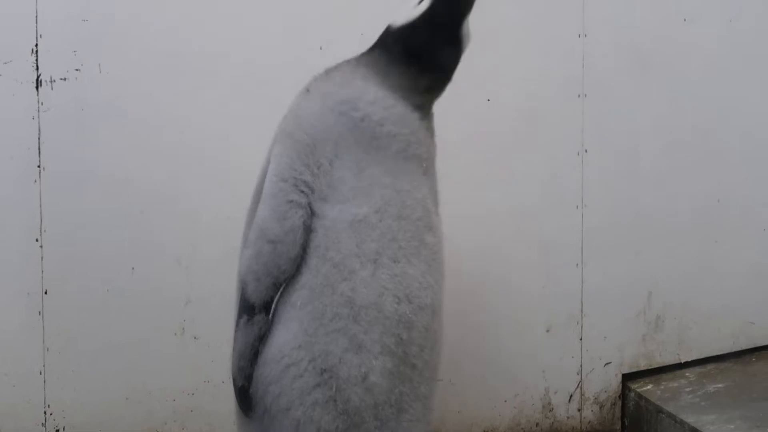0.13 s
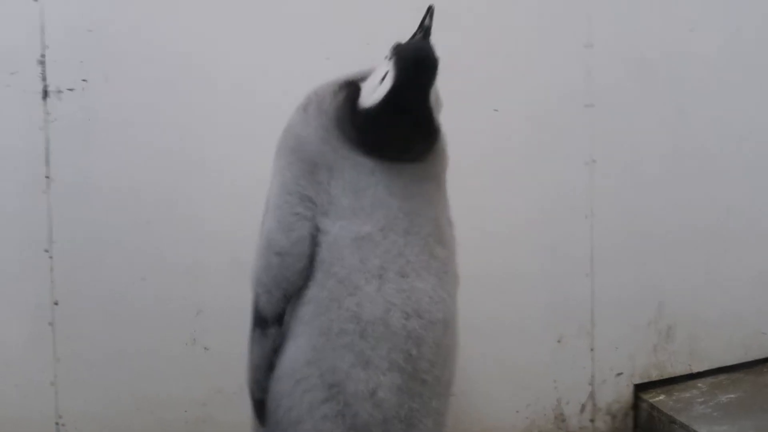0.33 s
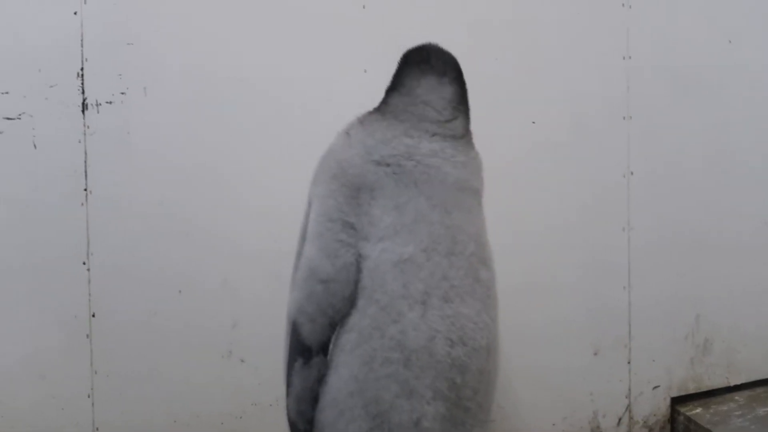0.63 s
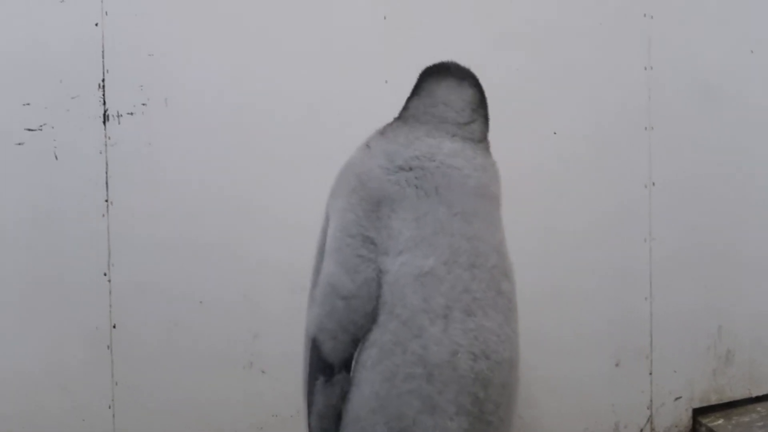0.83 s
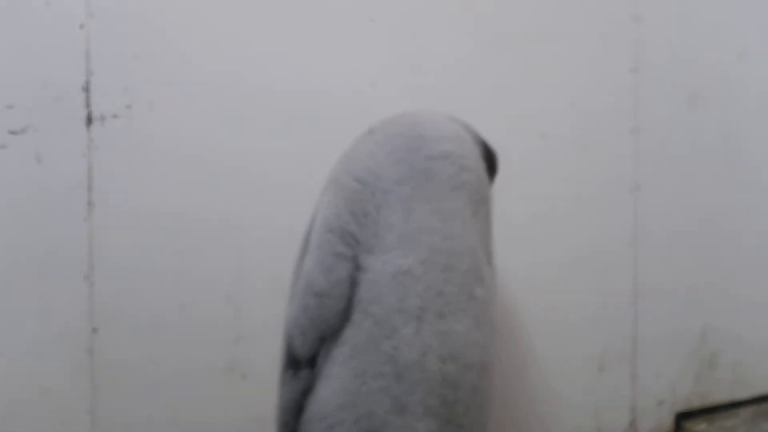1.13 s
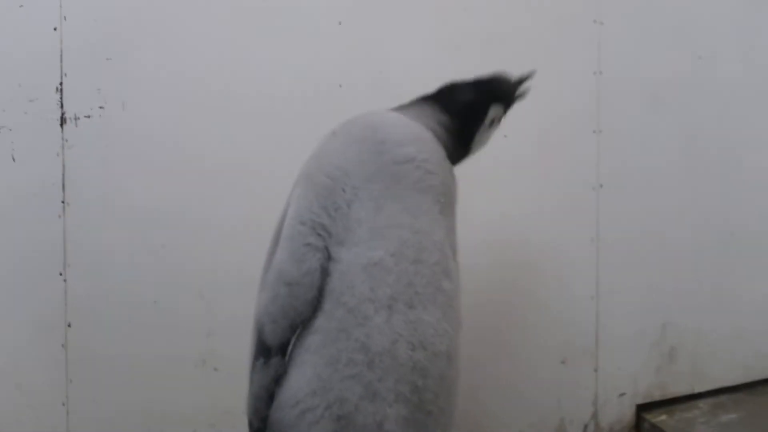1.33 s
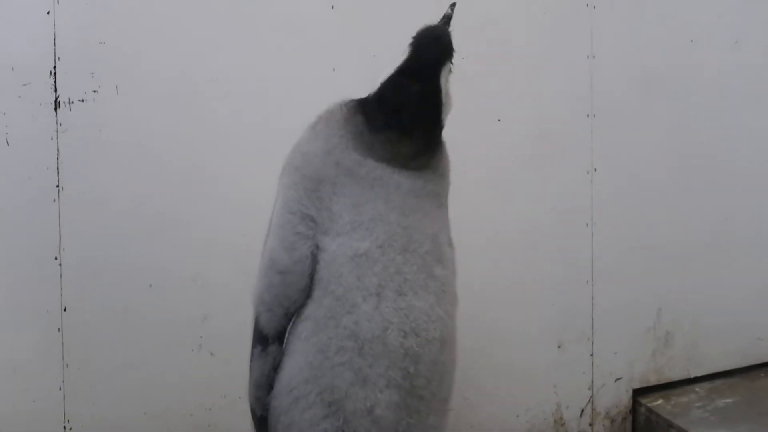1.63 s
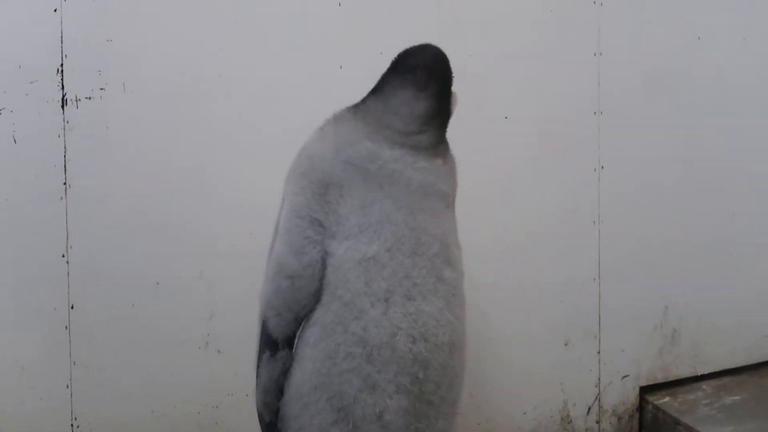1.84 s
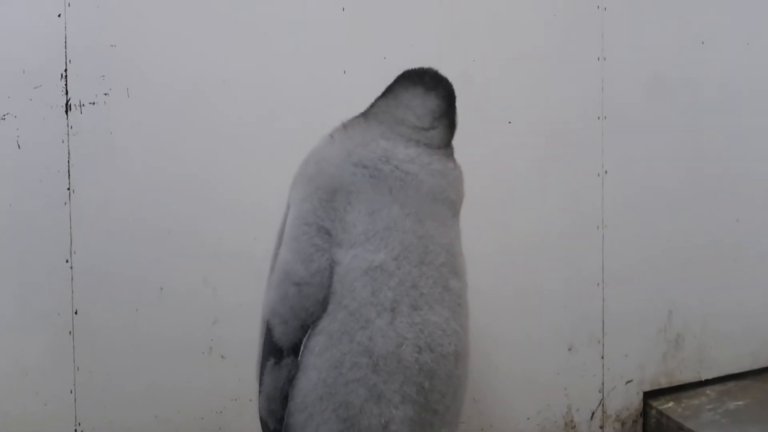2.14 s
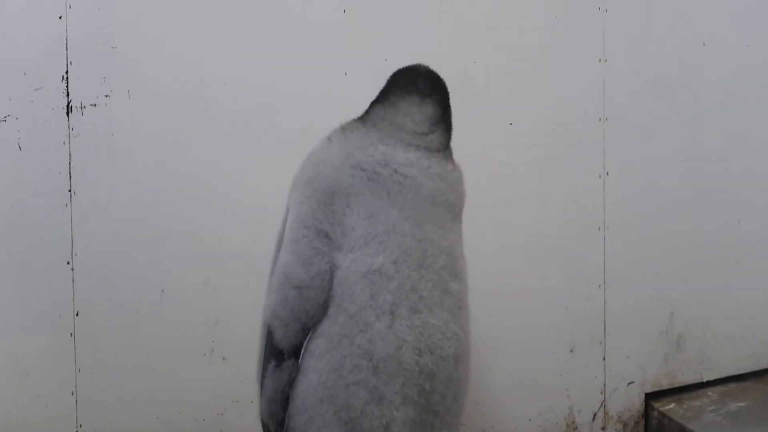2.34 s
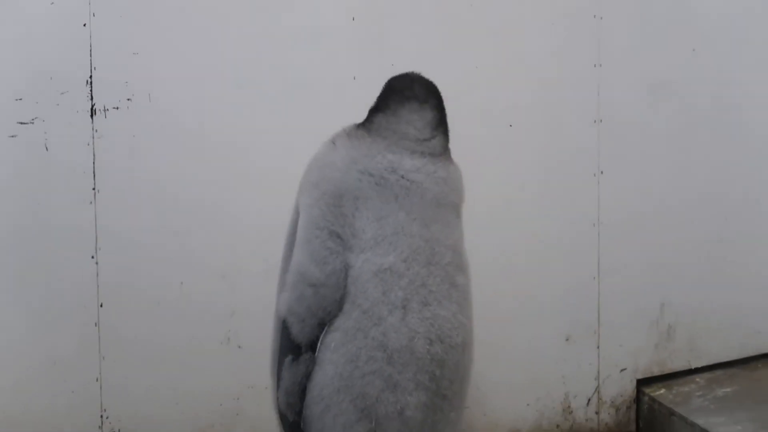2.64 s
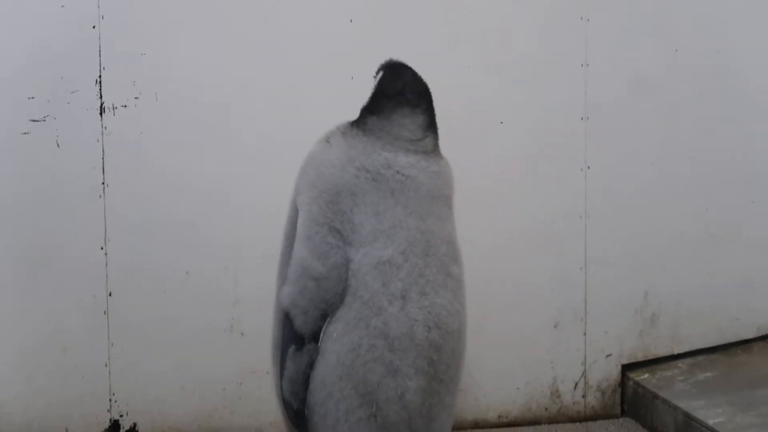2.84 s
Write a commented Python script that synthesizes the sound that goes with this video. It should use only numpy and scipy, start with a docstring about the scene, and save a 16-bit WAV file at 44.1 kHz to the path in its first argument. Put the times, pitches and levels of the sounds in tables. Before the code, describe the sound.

A penguin chick gives two shrill, rough-edged whistling calls in a bare, hard-walled room. Silence until 0.08 seconds, then sound opens abruptly inside the first call, which swoops up and down, falling until 0.35. Echoes fade. A second fluttering call runs from 1.25 to 1.6 and rings away. Low fans hum throughout; soft handling thuds come before 0.3, with tiny close rustles scattered later.

```python
"""A penguin chick whistles two calls of swooping, U-shaped notes in a bare, hard-walled cold room.
Cooling fans drone and hum all the time; soft rustles pass near the two-port microphone.
The chick is a pair of beating sine whistles with wall echoes and a noise tail; the fans are filtered
noise and motor tones; rustles, thuds and grip rumble are short swells of noise or low tone.
Silence comes first: the sound opens abruptly a moment after the start."""
import sys
import numpy as np
from scipy import signal
from scipy.fft import rfft, irfft, next_fast_len
from scipy.io import wavfile
from scipy.ndimage import uniform_filter1d, map_coordinates

SR = 44100
rng = np.random.default_rng(int(sys.argv[2]) if len(sys.argv) > 2 else 0)


def persist_wave(psi):
    """Save psi, clipped to +-1, as 16-bit WAV."""
    counts = np.round(np.clip(psi, -1, 1) * 32767).astype(np.int16)
    wavfile.write(sys.argv[1], SR, np.atleast_2d(counts).T)


def level_to_linear(level):
    """Convert decibel levels to linear amplitude factors, elementwise."""
    exponent = np.asarray(level, float) / 20
    return 10 ** exponent


N = 131418
TIME_S = np.arange(N) / SR


def unit(x):
    """Scales a signal to rms 1."""
    return x / np.sqrt(np.mean(x ** 2) + 1e-20)


def along(points, hz):
    """Reads a curve of (freq_hz, value) points on a log frequency axis."""
    freq_hz, value = np.transpose(points)
    return np.interp(np.log(hz + 1), np.log(freq_hz + 1), value)


def wobble(rate):
    """A smooth random curve with rate knots a second."""
    knots = rng.standard_normal(int(N * rate / SR) + 4)
    return map_coordinates(knots, [np.arange(N) * rate / SR])


def coloured(x, gain):
    """Filters x by a gain over frequency and scales it to rms 1."""
    size = next_fast_len(N + 8192)
    spectrum = rfft(x, size) * gain(np.fft.rfftfreq(size, 1 / SR))
    return unit(irfft(spectrum, size)[:N])


def hiss():
    """Plain white noise for the whole length."""
    return rng.standard_normal(N)


def rush(spectrum, patchy_db):
    """Noise of the given spectrum, rms 1, with random gain in patches of time and frequency."""
    cells = signal.stft(hiss(), nperseg=512)[2]
    field = uniform_filter1d(rng.standard_normal(cells.shape), size=6, axis=0)
    field = uniform_filter1d(field, size=14, axis=1)
    patchy = signal.istft(cells * level_to_linear(patchy_db * unit(field)), nperseg=512)[1][:N]
    return coloured(patchy, lambda hz: level_to_linear(along(spectrum, hz)))


def bursts(rows):
    """Bell-shaped swells from (centre_s, level_db, half_length_s) rows; half length is down to 1/e."""
    return sum(level_to_linear(db) * np.exp(-((TIME_S - s) / half) ** 2) for s, db, half in rows)


def at_ports(mid, side):
    """Left and right ports from the shared sound and the sound opposite between them."""
    return np.array([mid + side, mid - side])


# Spectrum shape of the fan air heard alike at both ports: freq_hz [Hz], density_db [relative dB per Hz]
FAN_SPECTRUM = [(12, -42.5), (20, -18), (59, -9), (86, -5.5), (171, -4), (204, -10.5), (278, -10.5),
                (340, -14.5), (506, -17.5), (604, -18), (1460, -27.5), (2600, -36), (3960, -46),
                (5000, -50.5), (8000, -59.5), (11000, -65.5), (14800, -70), (15400, -100)]
# Slow course of the drone, of which only the departure from its mean counts: time_s [s], strength_db [dB]
DRONE_COURSE = [(0.7, -35), (0.85, -34.5), (1.23, -35), (1.48, -35), (2.19, -33.5), (2.71, -35),
                (2.93, -35.5)]
FAN_DB, FLUTTER_DB = -30, 0.5  # rush level; slow chance swell


def fan_rush():
    """Turbulent air as patchy noise that swells slowly with the drone."""
    time_s, strength_db = np.transpose(DRONE_COURSE)
    drift_db = np.interp(TIME_S, time_s, strength_db - strength_db.mean())
    swell = level_to_linear(drift_db + FLUTTER_DB * wobble(3.1))
    return level_to_linear(FAN_DB) * swell * rush(FAN_SPECTRUM, patchy_db=1.0)


# Wavering motor tones: freq_hz [Hz], level_db [dB rms], width_hz [Hz from centre to half gain]
MOTOR_TONES = [(59, -43.5, 4.5), (116, -39.5, 7.2), (206.9, -43.5, 3.3), (284.5, -46, 2.6),
               (379.6, -48.5, 3.2), (477.2, -53.5, 2.9), (571.2, -51.5, 5.6)]


def motor_hum():
    """Motor tones as narrow bands of noise, so each one wavers by itself."""
    hum = 0
    for freq_hz, level_db, width_hz in MOTOR_TONES:
        band = coloured(hiss(), lambda f: 1 / (1 + ((f - freq_hz) / width_hz) ** 2))
        hum = hum + level_to_linear(level_db) * band
    return hum


STEADY_HZ, STEADY_DB = 119.6, -36.5  # level is rms, about which it wavers


def steady_hum():
    """The steady part of the hum: one sine with a little drift in level and phase."""
    level = level_to_linear(STEADY_DB + 0.94 * wobble(6.1))
    phase = 2 * np.pi * STEADY_HZ * TIME_S + 0.61 * wobble(3.055)
    return level * np.sqrt(2) * np.sin(phase)


# Spectrum shape of the air that differs between the ports: freq_hz [Hz], density_db [relative dB per Hz]
APART_SPECTRUM = [(25, 0.5), (100, -11), (180, 3), (330, 9), (1100, 4), (3900, -3), (6000, -9),
                  (10000, -16), (14500, -22.5), (15300, -59)]
APART_DB = -53


def fans():
    """Air rush and motor tones nearly alike at both ports, plus weak air noise opposite between them."""
    mid = fan_rush() + motor_hum() + steady_hum()
    return at_ports(mid, level_to_linear(APART_DB) * rush(APART_SPECTRUM, patchy_db=0.6))


WHINE_HZ, WHINE_DB = 13006, -88  # level is rms


def whine():
    """A thin electronic tone: one steady sine."""
    return level_to_linear(WHINE_DB) * np.sqrt(2) * np.sin(2 * np.pi * WHINE_HZ * TIME_S)


# Handling rumble: centre_s [s], level_db [dB at the peak of the swell], half_length_s [s down to 1/e]
GRIP_SWELLS = [(0.2, -44, .13)]
GRIP_HZ = 200  # half gain


def grip_rumble():
    """Low handling noise, opposite in sign at the two ports."""
    low = coloured(hiss(), lambda f: 1 / (1 + (f / GRIP_HZ) ** 2))
    return bursts(GRIP_SWELLS) * low * [[1], [-1]]


# Thuds of the hand-held body: centre_s [s], level_db [dB, peak of the bell before the port gains]
THUDS = [(0.091, -21.5), (0.28, -26)]
THUD_HZ, THUD_HALF_S, THUD_LEFT_DB = 35, 0.015, 1  # the left port gains what the right port loses


def thuds():
    """Low sines under short bells, a little stronger at the left port."""
    thud = 0
    for centre_s, level_db in THUDS:
        bell = bursts([(centre_s, level_db, THUD_HALF_S)])
        thud = thud + bell * np.sin(2 * np.pi * THUD_HZ * (TIME_S - centre_s))
    return thud * level_to_linear([[THUD_LEFT_DB], [-THUD_LEFT_DB]])


# Rustles: centre_s [s], level_db [dB rms of the part apart at the swell's peak], half_length_s [s to 1/e]
RUSTLE_SWELLS = [(0.26, -61, .008), (0.96, -67, 0.0069), (1.101, -55, 0.023), (1.25, -71.5, .03),
                 (1.42, -58, 0.005), (1.9, -65, 0.032), (2.08, -60, 0.012), (2.25, -74, 0.027),
                 (2.7, -65, 0.0094)]
# Spectrum shape of a rustle: freq_hz [Hz], density_db [relative dB per Hz]
RUSTLE_SPECTRUM = [(3000, -27), (4000, 2), (5600, 0.5), (8000, -3.5), (11500, -10), (15000, -21.5)]
RUSTLE_SHARED_DB = -2.5  # shared part relative to the part apart


def rustles():
    """Brief noise close to the ports, so partly shared and partly opposite between them."""
    mid = level_to_linear(RUSTLE_SHARED_DB) * rush(RUSTLE_SPECTRUM, patchy_db=2.5)
    side = rush(RUSTLE_SPECTRUM, patchy_db=2.0)
    return bursts(RUSTLE_SWELLS) * at_ports(mid, side)


# Decay of the room: freq_hz [Hz], t60_s [s to fall by 60 dB]
ROOM_DECAY = [(1000, 1.0), (2000, 0.81), (3000, 0.82), (4500, .7), (9000, 0.23)]
# Echoes off the near walls: delay_s [s], level_db [dB relative to the direct sound]
WALL_ECHOES = [(.004, -1.5), (.009, -14.5), (0.012, -10), (.021, -6.5), (0.029, -20)]
# Colour of the tail that is apart, stronger in the treble: freq_hz [Hz], gain_db [relative dB]
SIDE_TILT = [(1000, 0.5), (2000, -1.5), (3500, 5), (6000, 10.5)]
ECHO_DB, SIDE_ECHO_DB = -0.5, -13  # tail shared by the ports; tail apart
CHICK_LEFT_DB = 0.6  # the left port gains what the right port loses


def room(x):
    """Direct sound and near walls, then a diffuse tail: one shared by both ports, one apart."""
    hz, time_s, cells = signal.stft(rng.standard_normal((2, SR)), SR, nperseg=256)
    decay = level_to_linear(-60 * time_s / along(ROOM_DECAY, hz)[:, None])
    tail = signal.istft(cells * decay, SR, nperseg=256)[1]
    tail = tail / np.linalg.norm(tail[0]) * level_to_linear([[ECHO_DB], [SIDE_ECHO_DB]])
    late = np.pad(x, (350, 0))[None]  # the tail starts 350 samples after the direct sound
    mid, side = signal.fftconvolve(late, tail, axes=1)[:, :N]
    side = np.std(side) * coloured(side, lambda f: level_to_linear(along(SIDE_TILT, f)))
    near = x
    for delay_s, level_db in WALL_ECHOES:
        near = near + level_to_linear(level_db) * np.pad(x, (round(delay_s * SR), 0))[:N]
    return at_ports(mid, side) + near * level_to_linear([[CHICK_LEFT_DB], [-CHICK_LEFT_DB]])


# The two calls as bends of the whistle: time_s [s], pitch_hz [Hz], level_db [relative dB]
FIRST_CALL = [(0.0, 2475, -22), (0.018, 2900, -34.5), (0.035, 2330, -14.5), (0.05, 1755, -24),
              (0.066, 2065, -27.5), (0.086, 1995, -19), (0.101, 1720, -22.5), (0.125, 1629, -21.5),
              (0.145, 2193, -21.5), (0.165, 2799, -26), (0.173, 2395, -40.5), (0.182, 2142, -30.5),
              (0.2, 1757, -19), (0.22, 1315, -43), (0.235, 1508, -26.5), (0.25, 1771, -26),
              (0.262, 1857, -30.5), (0.272, 1993, -41), (0.284, 1790, -23.5), (0.292, 1720, -20.5),
              (0.297, 1359, -31), (0.315, 1254, -29.5), (0.324, 1148, -37.5), (0.336, 1123, -31.5),
              (0.35, 1147, -46.5)]
SECOND_CALL = [(1.241, 2358, -55.5), (1.251, 2450, -23), (1.258, 2805, -30.5), (1.265, 2425, -24.5),
               (1.279, 2543, -37.5), (1.296, 2432, -62.5), (1.311, 2416, -26.5), (1.323, 2848, -34.5),
               (1.333, 2250, -23.5), (1.341, 1952, -23.5), (1.354, 1721, -17.5), (1.364, 1681, -21.5),
               (1.378, 1902, -15.5), (1.388, 2059, -20), (1.396, 2044, -32), (1.409, 2089, -16.5),
               (1.422, 2122, -33.5), (1.432, 2052, -41), (1.443, 1895, -31.5), (1.453, 1791, -14.5),
               (1.46, 1523, -30), (1.472, 1399, -39), (1.49, 1520, -22), (1.512, 1817, -31.5),
               (1.524, 1999, -31.5), (1.538, 1810, -33), (1.552, 1720, -22.5), (1.562, 1350, -26),
               (1.576, 1483, -32.5), (1.6, 1696, -37.5), (1.625, 1547, -32), (1.645, 1450, -67)]
# Whistle, second and third partial: level_db [relative dB]
PARTIALS_DB = [-3, -16.5, -30.5]
# Voice breaks that add a side tone: centre_s [s], level_db [relative dB], half_length_s [s to 1/e],
# pitch_ratio [times the whistle]
VOICE_BREAKS = [(0.056, -6, 0.013, 1.5), (0.141, -8, 0.012, 1.48), (0.179, -10.5, 0.0087, 1.6),
                (0.263, -2.5, 0.011, 1.48), (1.388, -1, .005, 1.1), (1.395, -5, 0.0058, 1.48),
                (1.432, 2.5, 0.015, 1.25), (1.483, -12, 0.023, 1.9), (1.518, -4, 0.015, 1.4),
                (1.549, -9, 0.007, 1.5)]
# Colour of the throat: freq_hz [Hz], gain_db [relative dB]
THROAT_COLOUR = [(900, -6), (1300, -3.5), (1750, 1.5), (2100, 0.5), (2800, -1.5), (3500, -6.5), (4200, -12),
                 (4700, -22.5), (5600, -17.5), (7000, -30)]
TWIN_RATIO, TWIN_DB = 1.037, -7  # second half of the voice box: pitch ratio, relative level
JITTER, SHIMMER_DB = 0.008, 0.5  # scatter of pitch as a share, scatter of level
BREATH_DB = -19  # air noise relative to the whistle
CALL_LIFT_DB = 2  # added to the call levels


def whistle_pair(pitch_hz):
    """The two halves of the voice box, one a little higher so they beat, with partials and breaks."""
    tone = 0
    for ratio, level_db in [(1, 0), (TWIN_RATIO, TWIN_DB)]:
        unsteady_hz = ratio * pitch_hz * (1 + JITTER * wobble(250))
        phase = 2 * np.pi * np.cumsum(unsteady_hz) / SR
        half = sum(level_to_linear(db) * np.sin((k + 1) * phase) for k, db in enumerate(PARTIALS_DB))
        for centre_s, break_db, half_length_s, pitch_ratio in VOICE_BREAKS:
            half = half + bursts([(centre_s, break_db, half_length_s)]) * np.sin(pitch_ratio * phase)
        tone = tone + level_to_linear(level_db) * half
    return tone


def chick():
    """Whistles gliding through the call bends, roughened by air noise and coloured by the throat."""
    time_s, pitch_hz, level_db = np.transpose(FIRST_CALL + SECOND_CALL)
    glide_hz = uniform_filter1d(np.interp(TIME_S, time_s, pitch_hz), size=90)
    tone = whistle_pair(glide_hz)
    air = coloured(hiss(), lambda f: 1 / (1 + (f / 1200) ** 2))
    sounding = sum((TIME_S > c[0][0]) & (TIME_S < c[-1][0]) for c in (FIRST_CALL, SECOND_CALL))
    level = level_to_linear(np.interp(TIME_S, time_s, level_db) + CALL_LIFT_DB + SHIMMER_DB * wobble(120))
    voice = sounding * level * tone * (1 + level_to_linear(BREATH_DB) * air)
    return np.std(voice) * coloured(voice, lambda f: level_to_linear(along(THROAT_COLOUR, f)))


def scene():
    """The chick in the cold room, the fans, and the small sounds at the microphone."""
    small_sounds = grip_rumble() + rustles() + thuds() + whine()
    return room(chick()) + fans() + small_sounds


def band_limit(x):
    """A steep low-pass at the top of the band."""
    return signal.sosfilt(signal.butter(12, 15150, fs=SR, output="sos"), x)


OPENS_S, FADE_S = 0.0815, 0.0015


def record(dry):
    """The recorder opens abruptly: silence, then a very short ramp to full level."""
    opening = np.clip((TIME_S - OPENS_S) / FADE_S, 0, 1)
    return band_limit(dry * opening)


dry = scene()
out = record(dry)
persist_wave(out)
```